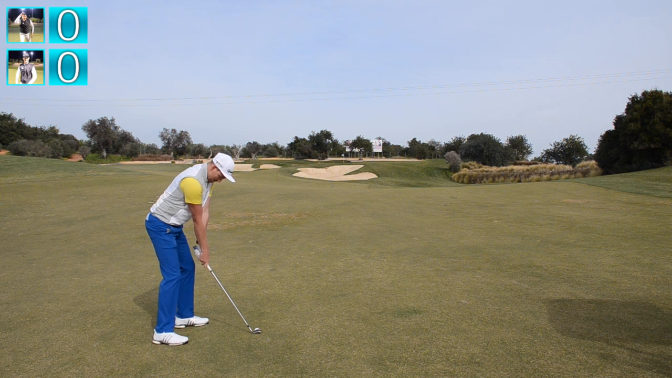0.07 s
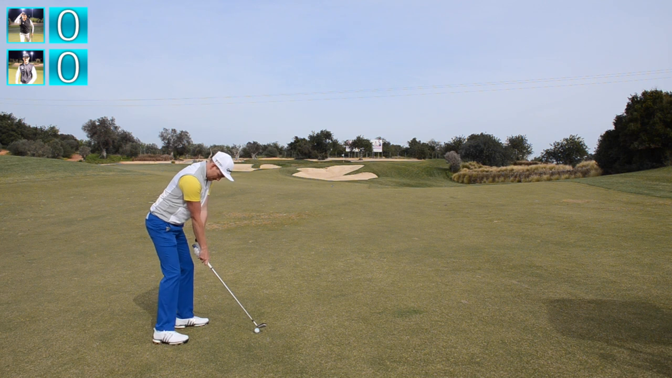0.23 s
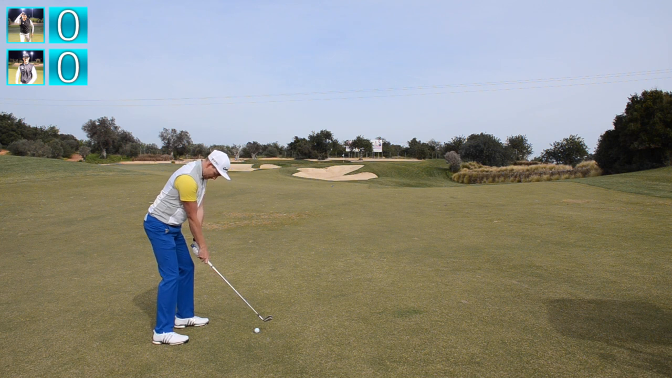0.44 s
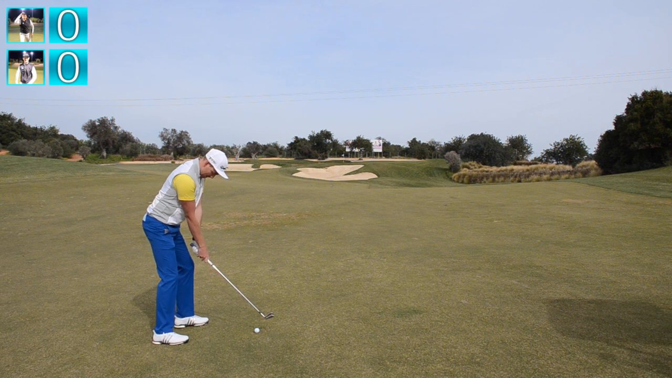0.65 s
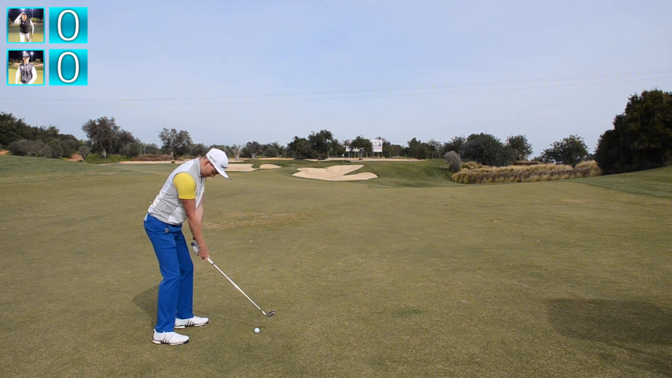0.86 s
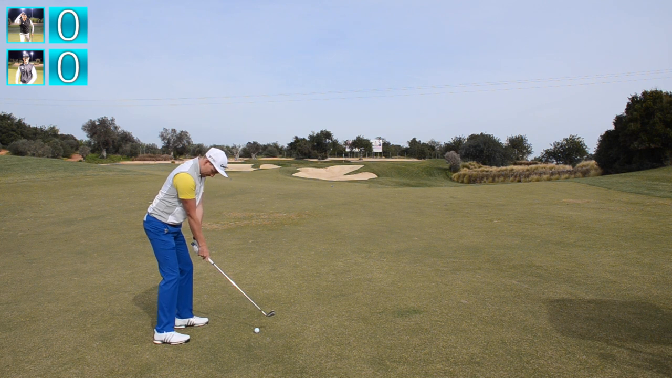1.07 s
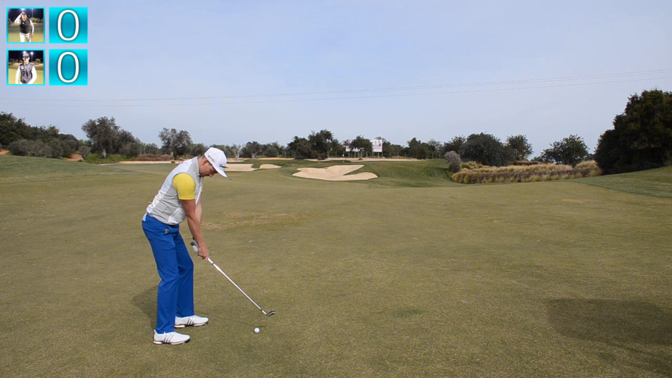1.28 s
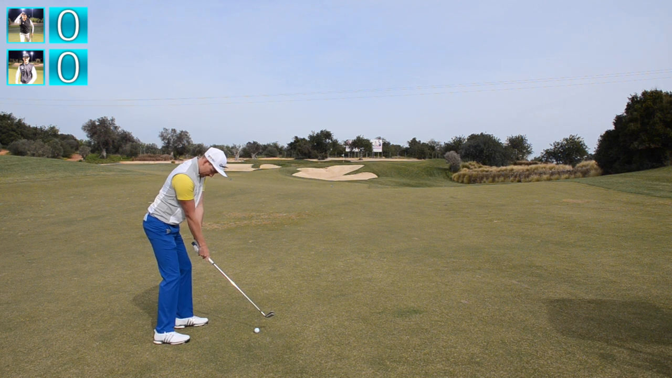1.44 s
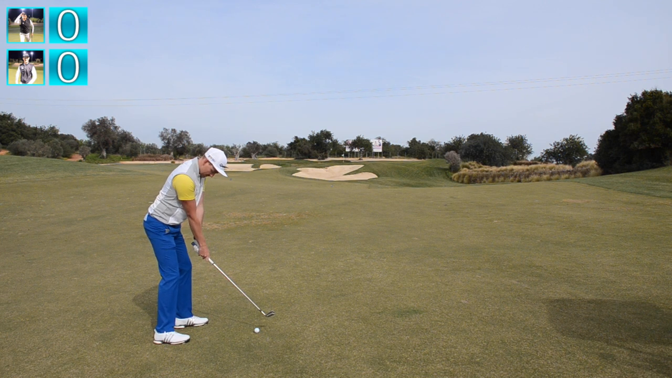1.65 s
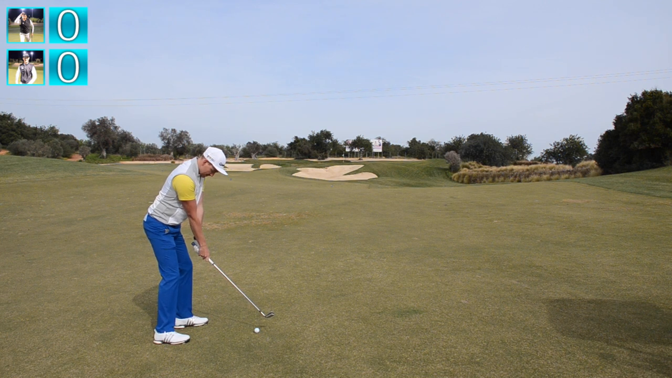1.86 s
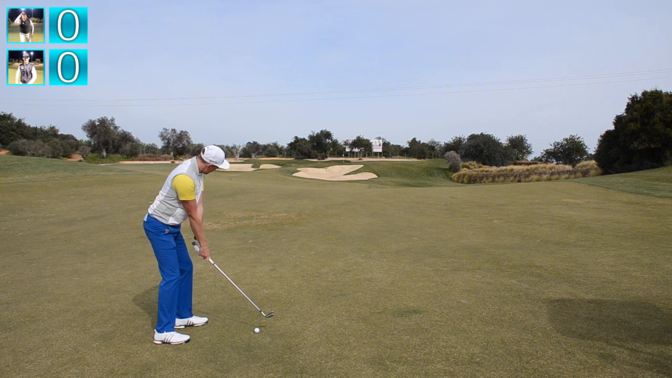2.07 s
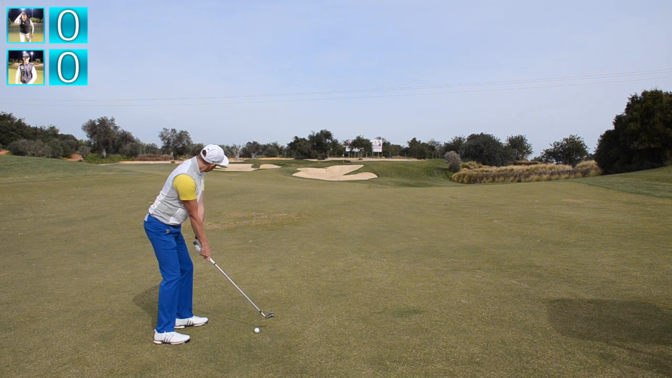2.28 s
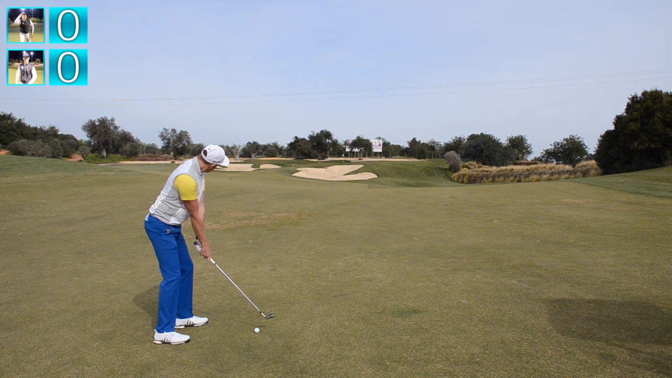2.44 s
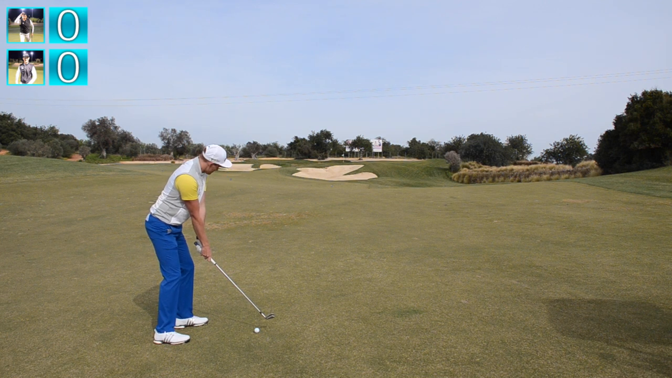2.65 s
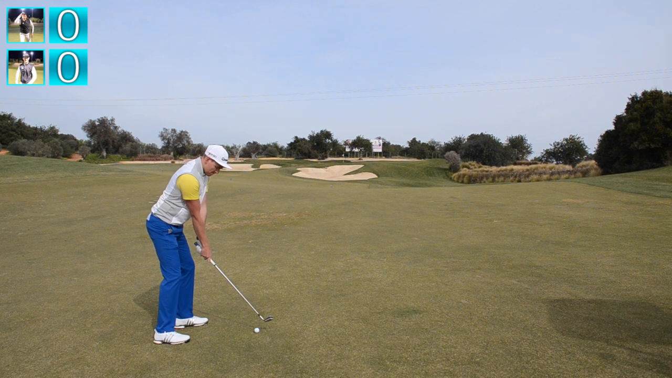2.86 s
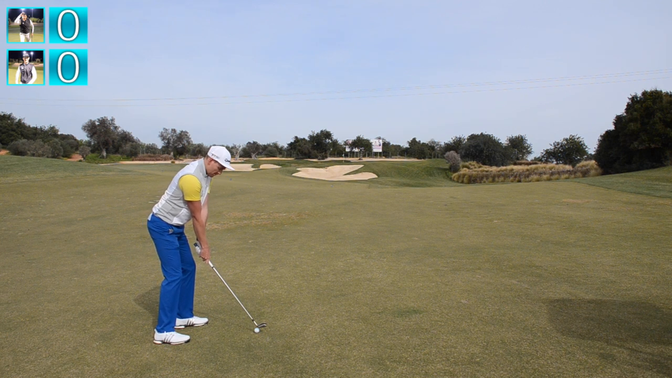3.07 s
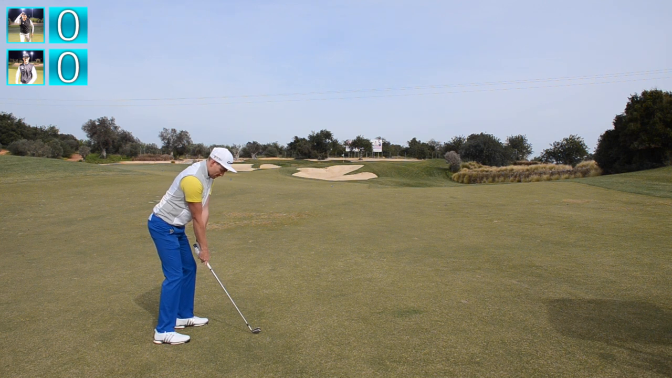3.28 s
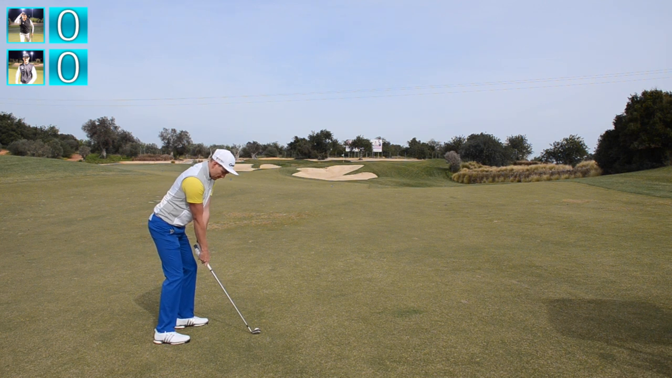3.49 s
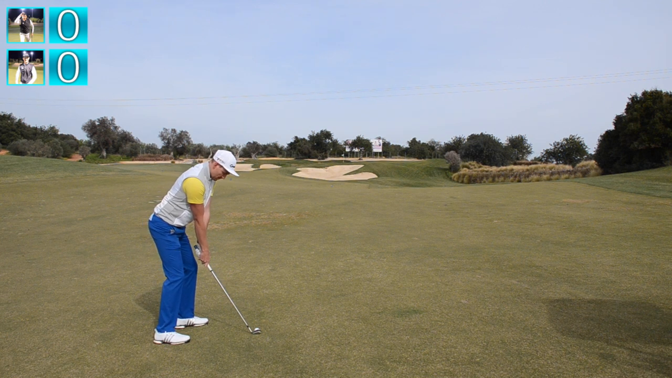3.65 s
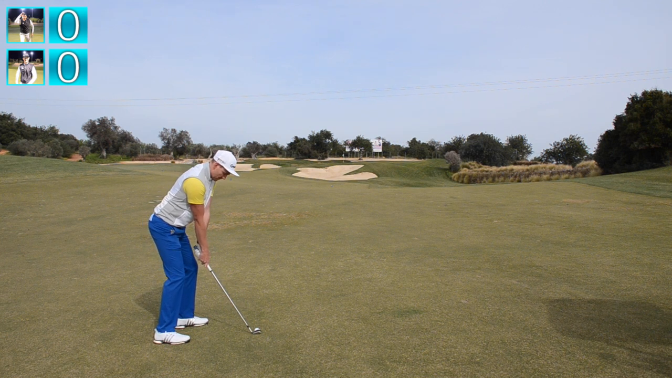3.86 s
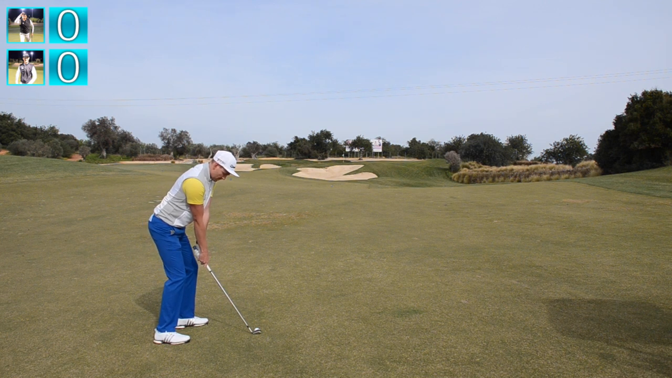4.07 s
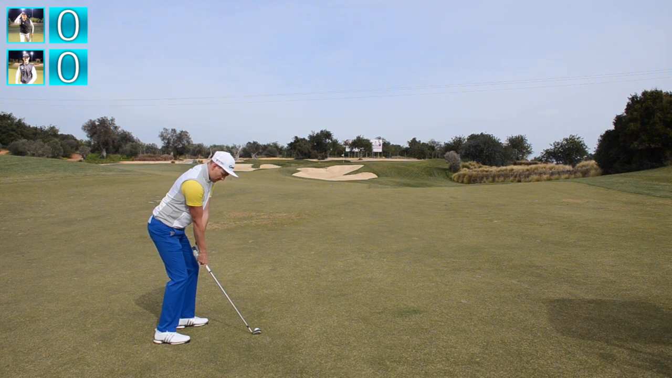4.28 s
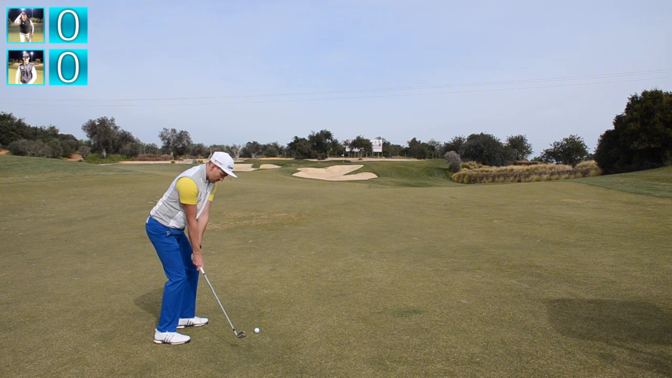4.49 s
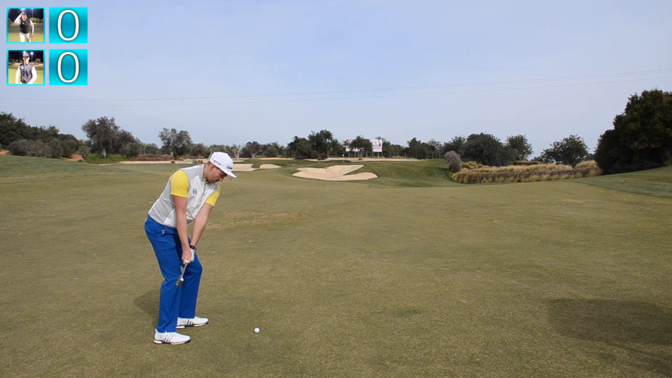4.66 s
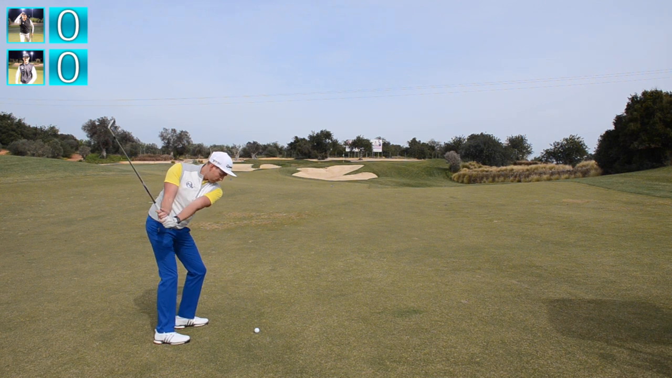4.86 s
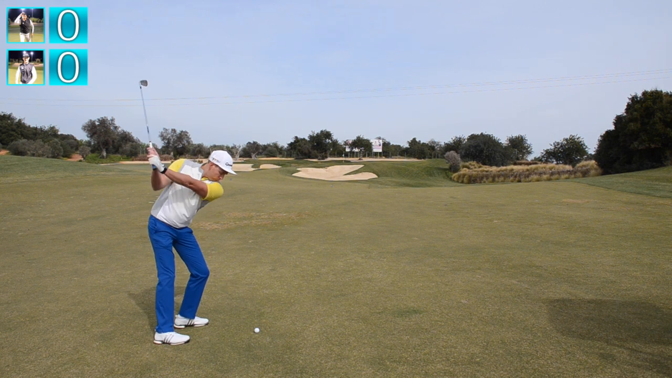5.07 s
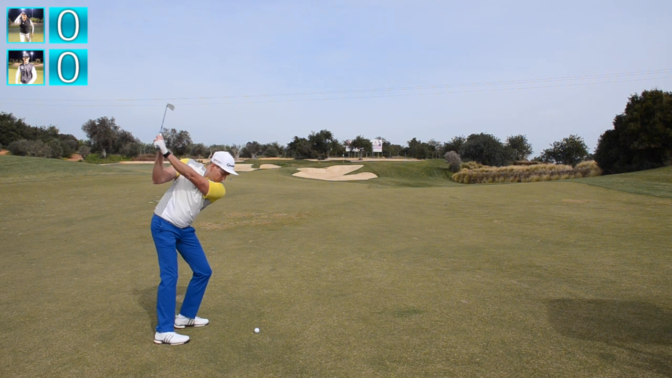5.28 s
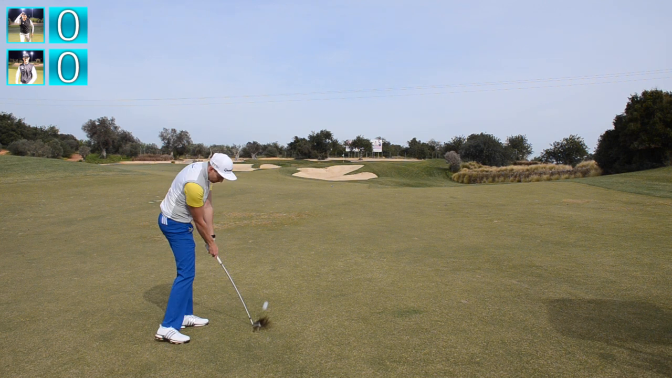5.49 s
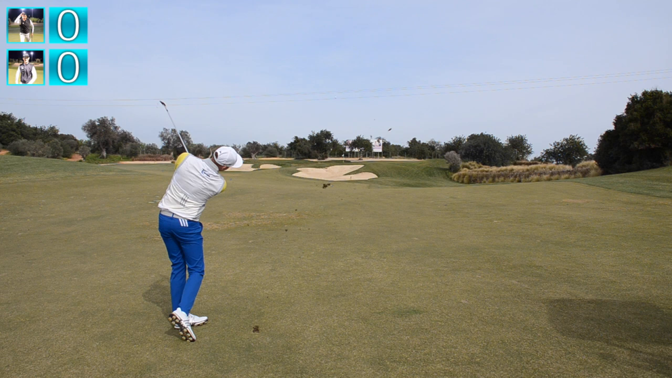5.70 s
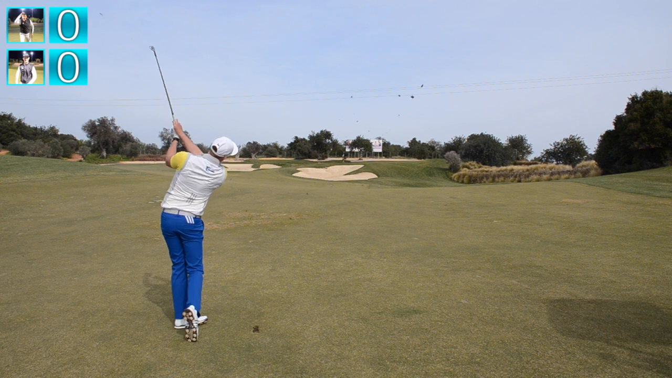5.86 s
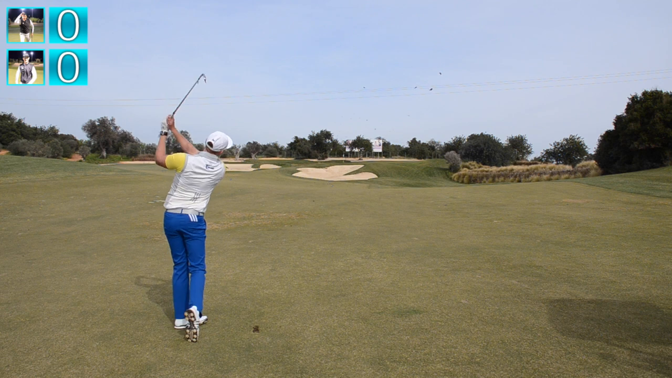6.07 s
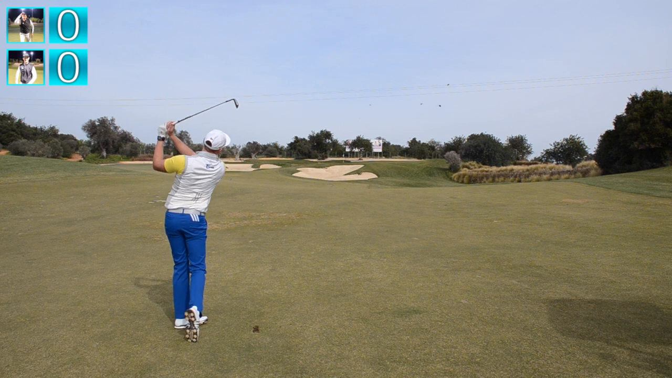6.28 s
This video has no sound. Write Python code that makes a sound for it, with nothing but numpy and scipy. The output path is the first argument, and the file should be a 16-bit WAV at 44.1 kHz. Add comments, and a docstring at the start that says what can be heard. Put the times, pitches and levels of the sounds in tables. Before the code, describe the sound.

On a quiet, open golf course, light wind rumbles and bumps against the microphone, then dies away. Birds call very faintly far off and clothes rustle softly. Near the end, straight ahead, an iron swishes down and hits the ball with one loud, sharp crack and a dull thud into the turf. The ball hisses away and fades.

```python
"""Wind nudges the microphone on a quiet, open golf course; birds call faintly, far off.
Straight ahead a golfer settles and swings an iron. The shaft swishes down, the face cracks against
the ball, and the sole tears the turf and thuds into the soil. The crack overloads the recorder, whose
gain ducks and recovers. The ball hisses away, its ground echo sweeping the tone down as it climbs."""
import sys
import numpy as np
from scipy import signal
from scipy.fft import rfft, irfft, next_fast_len
from scipy.io import wavfile

SR = 44100
rng = np.random.default_rng(int(sys.argv[2]) if len(sys.argv) > 2 else 0)


def unload_audio(sound):
    """Save the sound as a 16-bit wav file, at the path given as the first command line argument."""
    columns = np.transpose(np.atleast_2d(sound))
    # keep every value between -1 and 1, then stretch to whole-number steps
    steps = np.round(np.clip(columns, -1, 1) * 32767)
    wavfile.write(sys.argv[1], SR, steps.astype(np.int16))


N = 279285
TIME = np.arange(N) / SR
IMPACT_S = 5.58968

# How alike the two channels hear diffuse sound. Each row: frequency in Hz, left-right correlation.
STEREO_LIKENESS = [(60, 1), (130, 0.96), (290, 0.82), (640, 0.6), (1400, 0.45), (3100, 0.21), (6800, 0.046),
                   (15000, .08)]
# Spectrum of the ball's hiss and of the far wash. Each row: frequency in Hz, level in dB per Hz.
FLIGHT_SPECTRUM = [(50, -33), (150, -3), (350, 3), (650, 1.5), (1100, -2.5), (1800, -6.5), (3300, -13),
                   (4500, -26.5), (8000, -47)]


def from_db(db):
    """Decibels to gain."""
    return 10 ** (np.asarray(db) / 20)


def rms_one(x):
    """Scale to rms 1."""
    return x / np.sqrt(np.mean(x ** 2) + 1e-20)


def at_hz(points, hz):
    """Read a spectrum on a log-frequency axis."""
    point_hz, value = np.transpose(points)
    return np.interp(np.log(hz + 1e-9), np.log(point_hz), value)


def noise(spectrum, likeness=None):
    """Coloured noise of rms 1: mono, or stereo with a left-right correlation for each frequency."""
    size = next_fast_len(N, True)
    hz = np.fft.rfftfreq(size, 1 / SR)
    bins, side = rfft(rng.standard_normal((2, size))) * from_db(at_hz(spectrum, hz)) * (hz > 10)
    if likeness is not None:
        alike = np.clip(at_hz(likeness, hz), -1, 1)
        bins = np.sqrt(1 + alike) * bins + np.sqrt(1 - alike) * side * [[1], [-1]]
    return rms_one(irfft(bins, size)[..., :N])


def narrow_noise(centre_hz, width_hz, size=N):
    """A wavering tone of rms 1: slow noise carried on a steady or gliding centre frequency."""
    lowpass = signal.butter(2, width_hz / 2, fs=SR, output="sos")
    slow_a, slow_b = signal.sosfilt(lowpass, rng.standard_normal((2, size)))
    phase = 2 * np.pi * np.cumsum(centre_hz * np.ones(size)) / SR
    return rms_one(slow_a * np.cos(phase) + slow_b * np.sin(phase))


def pulse(spectrum, size=4096):
    """The shortest causal pulse with a given spectrum (minimum phase)."""
    cepstrum = irfft(np.log(from_db(at_hz(spectrum, np.fft.rfftfreq(size, 1 / SR)))))
    cepstrum[1:size // 2] *= 2
    cepstrum[size // 2 + 1:] = 0
    return irfft(np.exp(rfft(cepstrum)))


def add(out, start_s, sound):
    """Mix a short sound in at a given time."""
    start = max(round(start_s * SR), 0)
    out[start:start + len(sound)] += sound[:max(N - start, 0)]


def bell(t, length):
    """A smooth rise and fall around t = 0."""
    return np.exp(-np.minimum(2 * (t / length) ** 2, 20))


def swell(age, rise_s, t60):
    """A quick rise and an exponential decay, 60 dB in t60 seconds."""
    rise = 1 - np.exp(-np.minimum(age / rise_s, 20))
    return rise * np.exp(-np.minimum(np.log(1000) * age / t60, 20))


def since_impact(delay_s=0):
    """Seconds since the hit plus a delay; zero before that."""
    return np.maximum(TIME - IMPACT_S - delay_s, 0)


def wind(roughness=0.043):
    """Low turbulence and single eddies bump the microphone, dying away before the swing."""
    # Rumble at the capsule. Each row: frequency in Hz, level in dB per Hz.
    spectrum = [(12, -33), (20, -8), (43, 2), (91, -7.5), (117, -9.5), (183, -22.5), (260, -39.5),
                (320, -29), (420, -68), (700, -120)]
    # Gusts. Each row: time of the peak in seconds, length in seconds, level in dB.
    gusts = [(0.163, 0.26, -42), (0.554, 0.38, -50), (1.095, 0.28, -42), (1.312, 0.1, -39.5),
             (1.506, 0.055, -42), (1.606, 0.023, -46.5), (1.89, .11, -52), (2.257, 0.23, -53.5),
             (2.596, 0.14, -48.5)]
    # Single eddies. Each row: time of the peak in seconds, peak level in dB, half-width in seconds.
    eddies = [(0.183, -32.5, 0.0026), (0.293, -34.5, 0.003), (0.692, -37, 0.0049), (1.059, -31, 0.0057),
              (1.275, -21.5, 0.0035), (1.488, -35, 0.0021), (1.78, -43, .004), (2.133, -37, 0.0053),
              (2.635, -36, 0.0043), (3.227, -49, 0.0042)]
    gusting = sum(from_db(db) * bell(TIME - peak_s, length) for peak_s, length, db in gusts)
    bumps = np.zeros(N)
    for peak_s, db, width in eddies:
        u = np.arange(-10 * width, 10 * width, 1 / SR) / width
        push = (1 - u ** 2) * np.exp(-u ** 2 / 2)   # a push between two suctions
        add(bumps, peak_s - 10 * width, from_db(db) * push)
    return gusting * noise(spectrum) + bumps * (1 + roughness * narrow_noise(280, width_hz=260))


def air_and_hiss(air_db=-57.0, breeze_db=2.5, calming_s=0.37, hiss_db=-67.5):
    """Open air, a little louder until the breeze drops, and the microphone's own hiss."""
    # Distant air over the course. Each row: frequency in Hz, level in dB per Hz.
    air_spectrum = [(20, -15), (35, -4.5), (60, 0.5), (125, -4.5), (210, -5.5), (330, -10), (600, -11),
                    (1000, -12), (1800, -16.5), (3000, -21), (4200, -27.5), (6500, -45)]
    # Microphone self-noise. Each row: frequency in Hz, level in dB per Hz.
    hiss_spectrum = [(1000, -2.5), (5000, 1.5), (9000, -1.5), (15500, -1)]
    air = from_db(air_db + breeze_db * np.exp(-TIME / calming_s)) * noise(air_spectrum, STEREO_LIKENESS)
    return air + from_db(hiss_db) * noise(hiss_spectrum, STEREO_LIKENESS)


def birds(waver_share=0.13):
    """Faint calls from far off, each a short wavering note."""
    # Each row: time of the peak in seconds, length in seconds, pitch in Hz, level in dB.
    calls = [(0.41, .03, 2600, -75), (0.485, .063, 2230, -70), (0.643, .071, 3200, -67.5),
             (1.736, .0092, 3240, -63), (1.844, 0.0097, 2050, -59.5), (4.15, .082, 3170, -73),
             (6.269, 0.17, 1484, -60)]
    out, t = np.zeros(N), np.arange(SR) / SR - .5
    for peak_s, length, hz, db in calls:
        add(out, peak_s - .5, from_db(db) * bell(t, length) * narrow_noise(hz, waver_share * hz, SR))
    return out


def rustles(centre_hz=2100, width_hz=2000):
    """Clothes and grass brush softly as the golfer settles and swings."""
    # Each row: time of the peak in seconds, length in seconds, level in dB.
    brushes = [(0.45, 0.094, -66), (0.637, 0.063, -65.5), (0.827, .074, -65.5), (1.01, 0.2, -65),
               (1.39, .07, -68), (1.743, .02, -62.5), (3.891, 0.036, -66), (4.861, 0.0025, -56),
               (4.869, 0.2, -67.5), (5.46, 0.17, -63)]
    movement = sum(from_db(db) * bell(TIME - peak_s, length) for peak_s, length, db in brushes)
    return movement * narrow_noise(centre_hz, width_hz)


def club_speed(fastest_s=5.577, width_s=.042, brake_s=.15):
    """Share of full speed: a sharp peak at the bottom of the arc, then the turf brakes the club."""
    return np.exp(-since_impact() / brake_s) / np.hypot(1, (TIME - fastest_s) / width_s)


def swish(top_hz=589, whistle_db=-34, rush_db=-29.5):
    """Vortices shed by the shaft whistle higher as it speeds up; the head adds a broad rush."""
    # Air around the clubhead. Each row: frequency in Hz, level in dB per Hz.
    rush_spectrum = [(40, -6), (150, -17), (380, 8.5), (520, 1), (750, 5), (1600, 0), (2500, -6.5),
                     (3400, -12.5), (4600, -29.5), (8000, -43), (15000, -56)]
    speed = club_speed()
    shedding = np.interp(speed, [.47, .61], [0, 1])   # the whistle sets in around half speed
    whistle = from_db(whistle_db) * shedding * speed ** 1.8 * narrow_noise(top_hz * speed, width_hz=140)
    rush = from_db(rush_db) * speed ** 4.2 * noise(rush_spectrum)
    return whistle + rush


def crack(rebound_hz=1020, rebound_width_hz=540):
    """One hard pulse; the ball squashes and rebounds, which spreads it over about a millisecond."""
    # Pressure pulse of face on ball. Each row: frequency in Hz, level in dB.
    spectrum = [(60, 10), (200, 15), (400, 24), (650, 25), (950, 20), (1700, 25), (2500, 21), (3200, 11.5),
                (3800, 2), (5200, -7.5), (9000, -3), (15000, -15)]
    radius = np.exp(-np.pi * rebound_width_hz / SR)
    poles = np.array([1, -2 * radius * np.cos(2 * np.pi * rebound_hz / SR), radius ** 2])
    out = np.zeros(N)
    add(out, IMPACT_S, -signal.lfilter(poles[::-1], poles, pulse(spectrum)))   # all-pass smear
    return out


def ring(delay_s=.0019, rise_s=.0002):
    """Head, ball and ground ring briefly once the ball has left the face."""
    # Each row: frequency in Hz, level in dB, seconds to fall 60 dB.
    modes = [(245, -16, .04), (443, -29, .02), (650, -8, .02), (1035, -13, .014), (1253, -13, .018),
             (1580, -13, .021), (2050, -29, .031), (2210, -26, .027), (2720, -28, .03), (3200, -23, .019),
             (3350, -13, .018), (4700, -39, .026), (6100, -44, .02)]
    out, age = np.zeros(N), np.arange(SR // 10) / SR
    for hz, db, t60 in modes:
        tone = np.sin(2 * np.pi * hz * age)
        add(out, IMPACT_S + delay_s, from_db(db) * swell(age, rise_s, t60) * tone)
    return out


def turf(level_db=-16, delay_s=0.0022, rise_s=0.0025, t60=0.053, treble_hz=4500, treble_t60=0.024):
    """The sole tears through grass just after the ball; the treble dies first."""
    # Tearing grass. Each row: frequency in Hz, level in dB per Hz.
    spectrum = [(40, -4), (350, 8), (1000, -27), (1600, -9), (2400, -3), (3500, -10.5), (4300, -25),
                (7000, -18), (12000, -33), (15500, -34)]
    age, grass = since_impact(delay_s), noise(spectrum)
    dull = signal.sosfiltfilt(signal.butter(2, treble_hz, fs=SR, output="sos"), grass)
    treble = grass - dull
    return from_db(level_db) * (swell(age, rise_s, t60) * dull + swell(age, rise_s, treble_t60) * treble)


def strike(low_cut_hz=130, bass_share=.45):
    """Crack, ring and torn grass; such small bodies radiate only a share of their bass."""
    blow = crack() + ring() + turf()
    thin = signal.sosfilt(signal.butter(2, low_cut_hz, "high", fs=SR, output="sos"), blow + 1e-18)
    return (1 - bass_share) * thin + bass_share * blow


def thud(thump_db=-21.5, start_hz=206, end_hz=66, sag_s=0.027, roughness=0.31, soil_db=-38):
    """The sole digs unevenly into the soil and slows: a thump sinks in pitch, loose earth rumbles."""
    age = since_impact(delay_s=0.0037)
    hz = end_hz + (start_hz - end_hz) * np.exp(-age / sag_s)
    tone = np.sin(2 * np.pi * np.cumsum(hz * (age > 0)) / SR)
    lumps = 1 + roughness * narrow_noise(45, width_hz=60)
    thump = from_db(thump_db) * swell(age, rise_s=.0008, t60=0.18) * lumps * tone
    soil = from_db(soil_db) * swell(age, rise_s=0.0113, t60=0.39) * narrow_noise(68, width_hz=70)
    return thump + soil


def ball_flight(level_db=-38.3, fade_db_per_s=15.5, rise_s=0.021, start_m=6.4, m_per_s=64,
                echo_share=0.57, first_lag_s=0.00091, added_lag_s=0.00504, climb_s=1.0, grass_hz=2600):
    """The spinning ball hisses away; as it climbs, its ground echo lags more and the comb slides down."""
    age = since_impact()
    distance_m = start_m + m_per_s * age   # from the microphone
    onset = 1 - np.exp(-age / rise_s)
    gain = from_db(level_db - fade_db_per_s * age) * onset * start_m / distance_m
    lag_s = first_lag_s + added_lag_s * (1 - np.exp(-age / climb_s))
    hiss = noise(FLIGHT_SPECTRUM)
    # grass swallows the echo's treble
    dulled = signal.sosfiltfilt(signal.butter(1, grass_hz, fs=SR, output="sos"), hiss)
    echo = np.interp(TIME - lag_s, TIME, dulled)
    return gain * rms_one(hiss + echo_share * echo)


def scatter(level_db=-57, rise_s=0.029, t60=0.34):
    """Turf and far trees return a faint, wide wash of the crack."""
    return from_db(level_db) * swell(since_impact(), rise_s, t60) * noise(FLIGHT_SPECTRUM, STEREO_LIKENESS)


def flight_tail(peak_s=6.258, length_s=0.26, hz=330, width_hz=220, level_db=-59.0):
    """The departing ball's hiss ends in a faint low hum."""
    return from_db(level_db) * bell(TIME - peak_s, length_s) * narrow_noise(hz, width_hz)


def scene():
    """The golfer is straight ahead of the microphone; only air, self-noise and scatter are wide."""
    return (air_and_hiss() + birds() + flight_tail() + wind()
            + rustles() + swish() + strike() + thud() + ball_flight() + scatter())


def gain_control(x, threshold_db=-12, slope=.5, release_db_per_s=30, attack_s=.004):
    """Peaks over the threshold pull the recorder's gain down; it creeps back."""
    peak_db = 20 * np.log10(np.abs(x).max(axis=0) + 1e-9)
    cut_db = slope * np.maximum(peak_db - threshold_db, 0)
    held_db = np.maximum.accumulate(cut_db + release_db_per_s * TIME) - release_db_per_s * TIME
    pole = np.exp(-1 / (attack_s * SR))
    return x * from_db(-signal.lfilter([1 - pole], [1, -pole], held_db))


def record(dry, cutoff_hz=15900):
    """The recorder ducks its gain, clips at full scale and cuts off the top of the treble."""
    clipped = np.clip(gain_control(dry), -1, 1)
    return signal.sosfilt(signal.ellip(10, .1, 70, cutoff_hz, fs=SR, output="sos"), clipped)


dry = scene()
out = record(dry)
unload_audio(out)
```